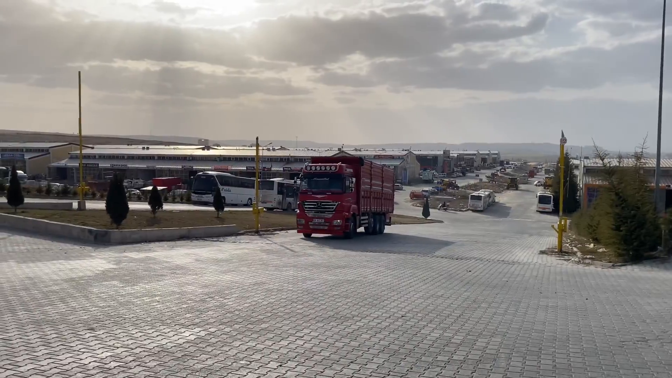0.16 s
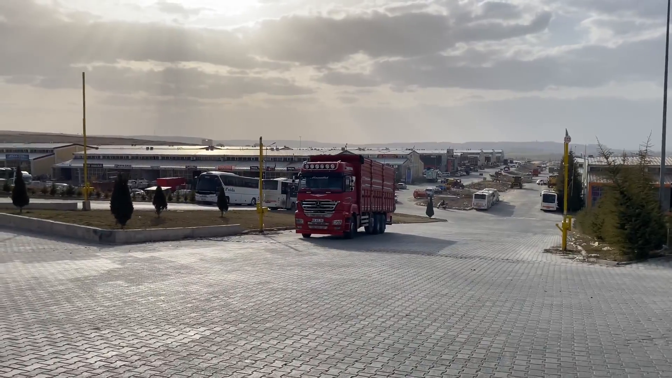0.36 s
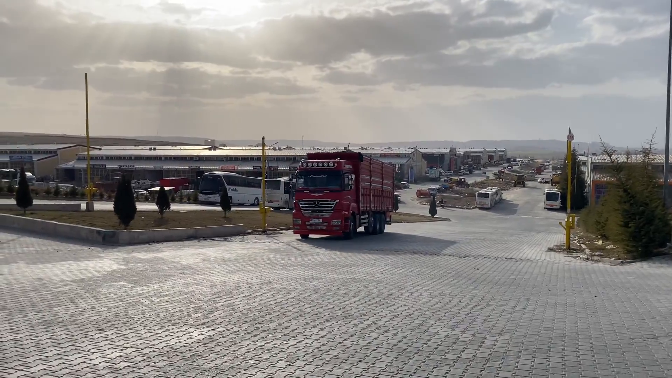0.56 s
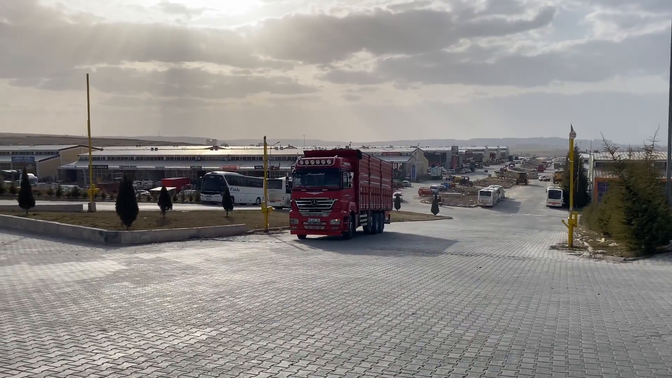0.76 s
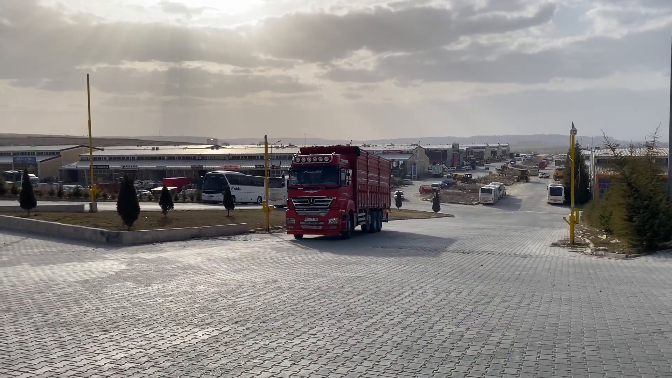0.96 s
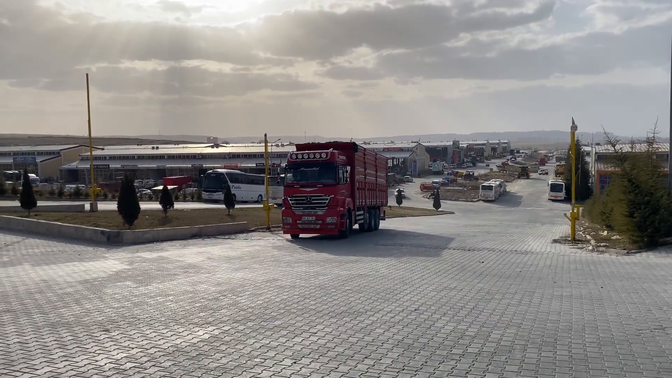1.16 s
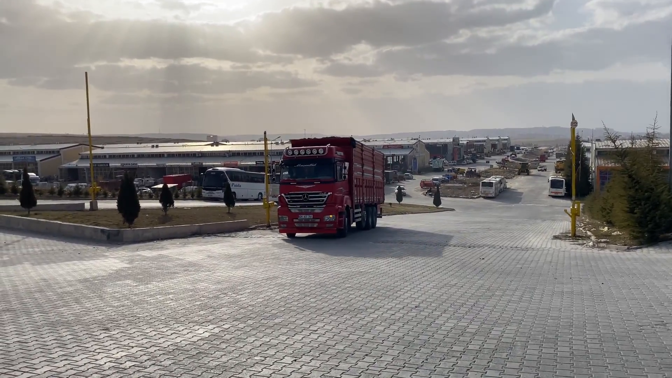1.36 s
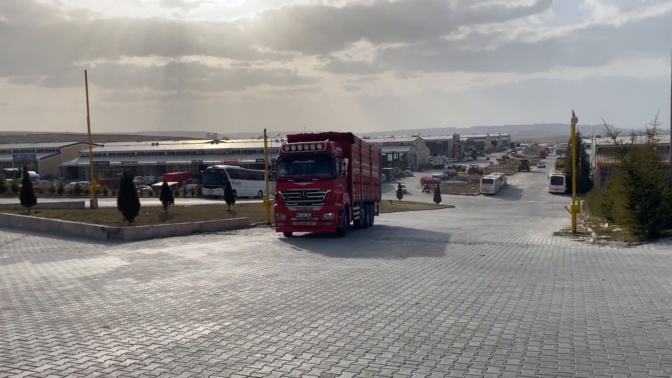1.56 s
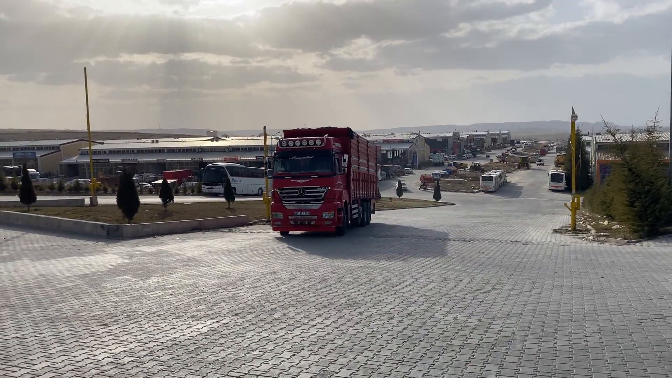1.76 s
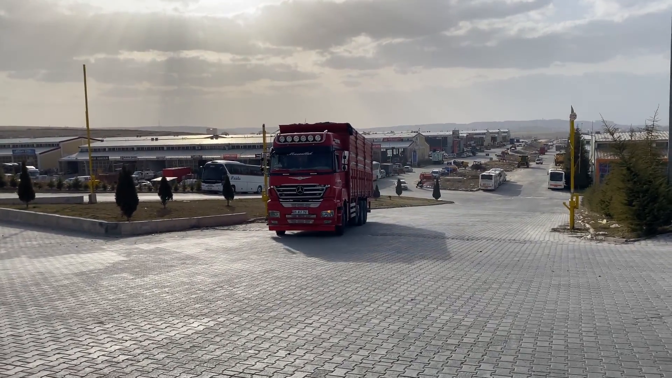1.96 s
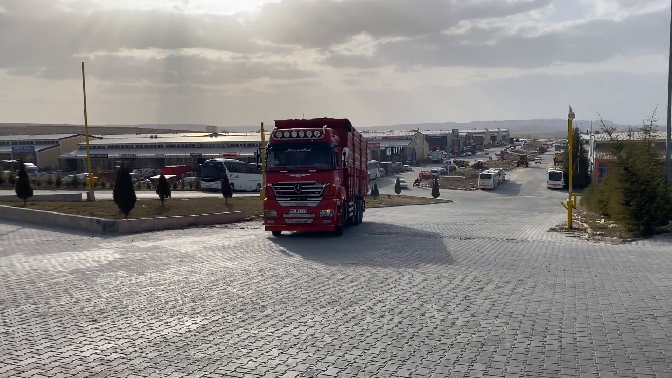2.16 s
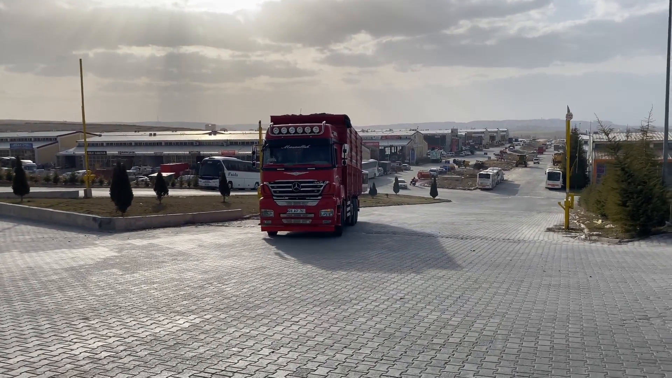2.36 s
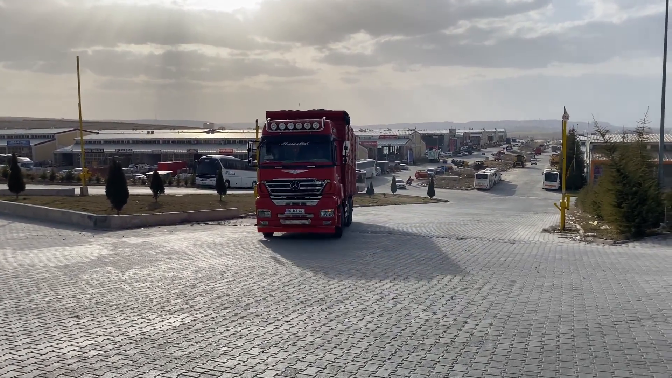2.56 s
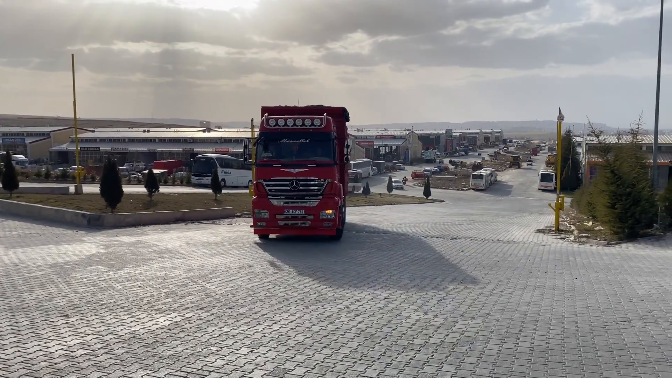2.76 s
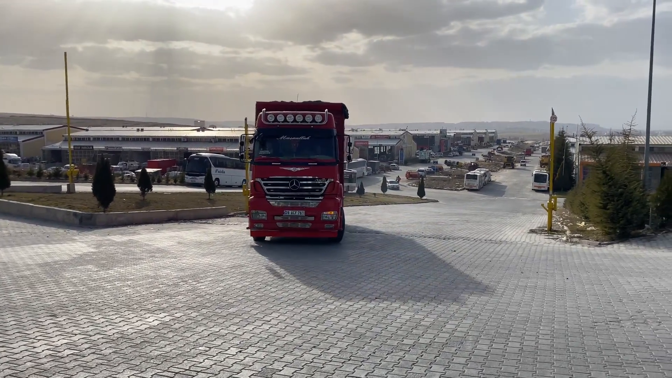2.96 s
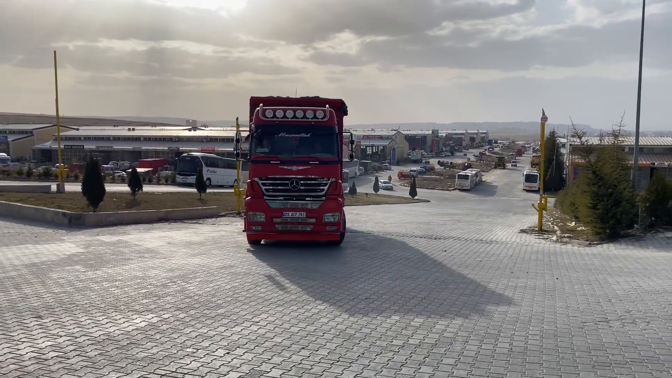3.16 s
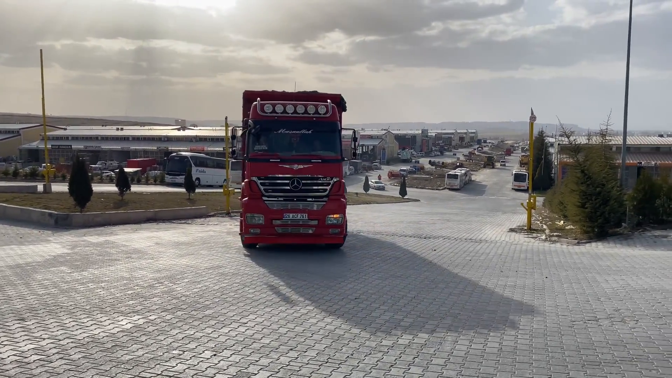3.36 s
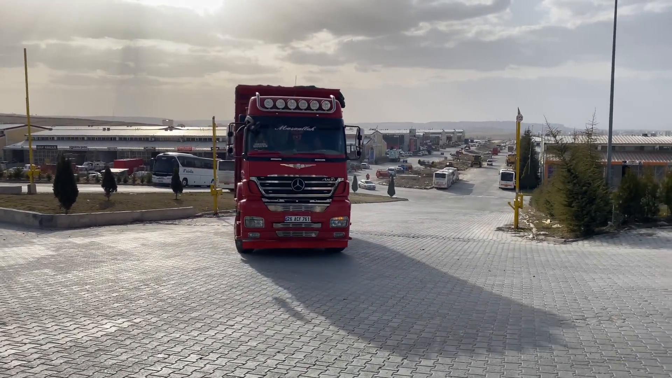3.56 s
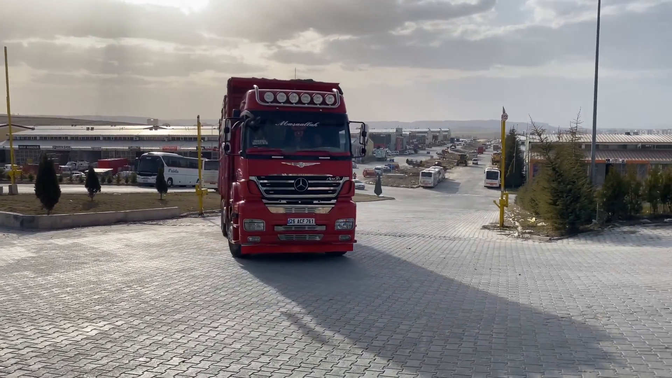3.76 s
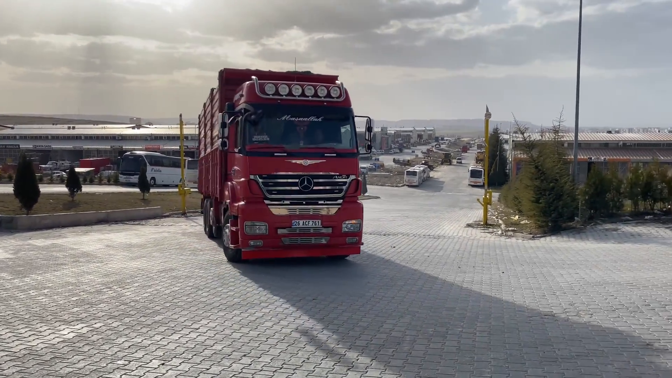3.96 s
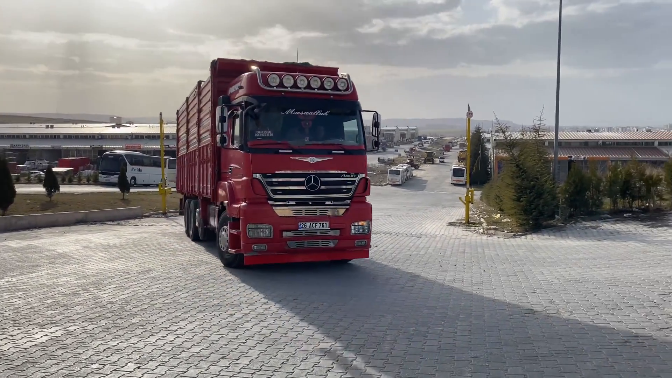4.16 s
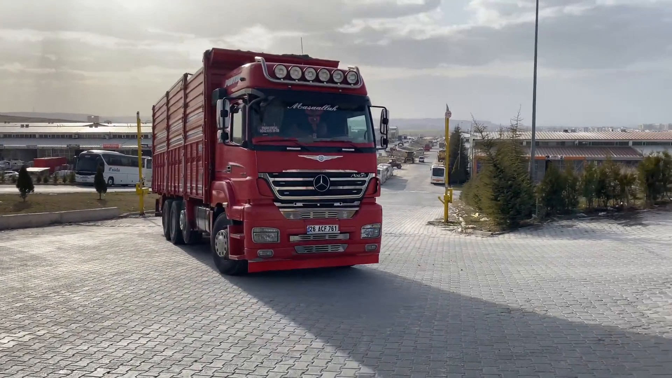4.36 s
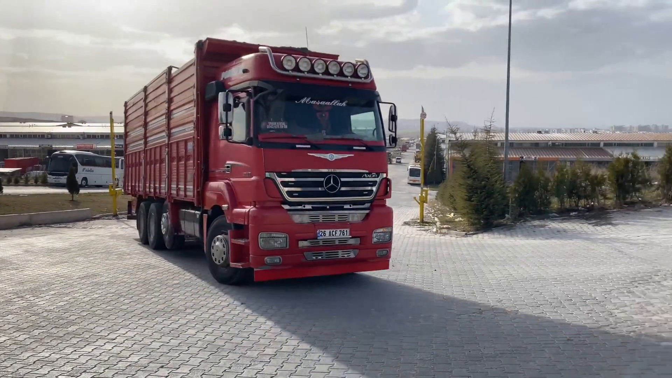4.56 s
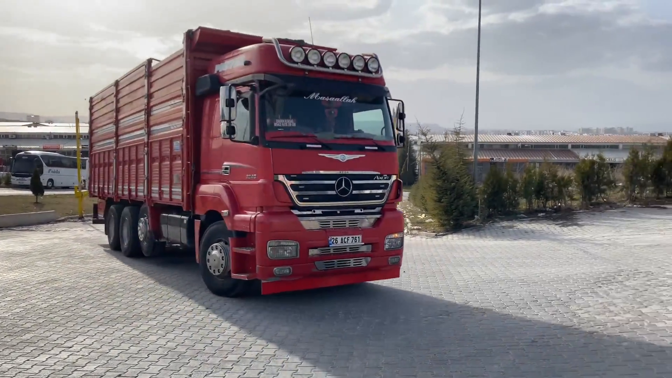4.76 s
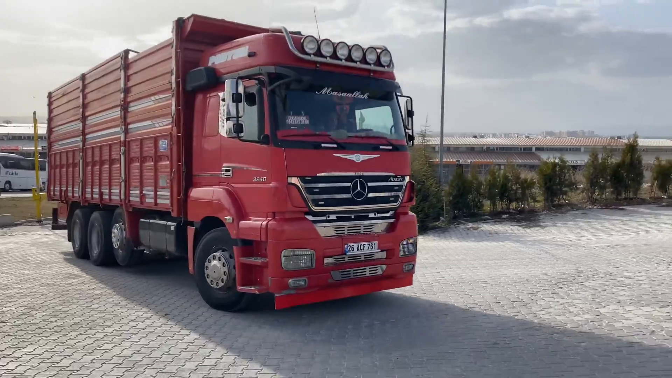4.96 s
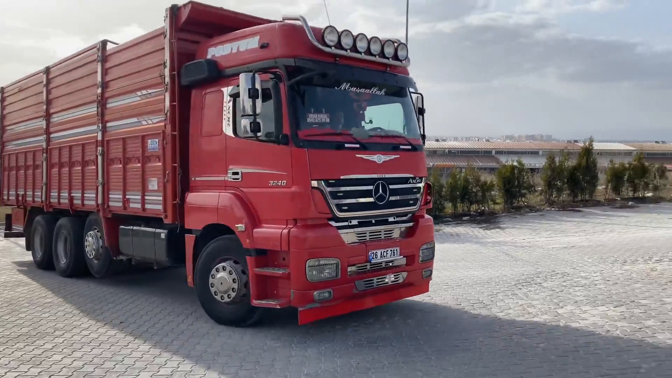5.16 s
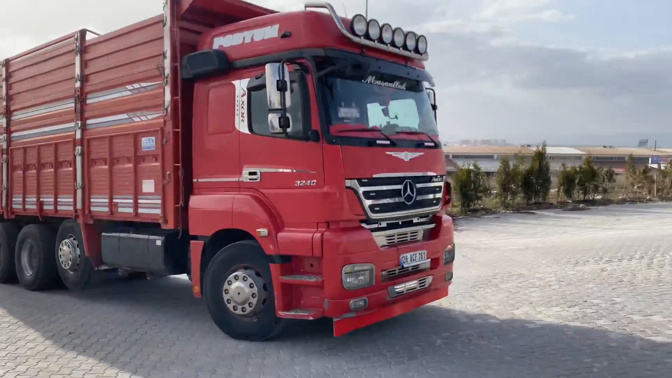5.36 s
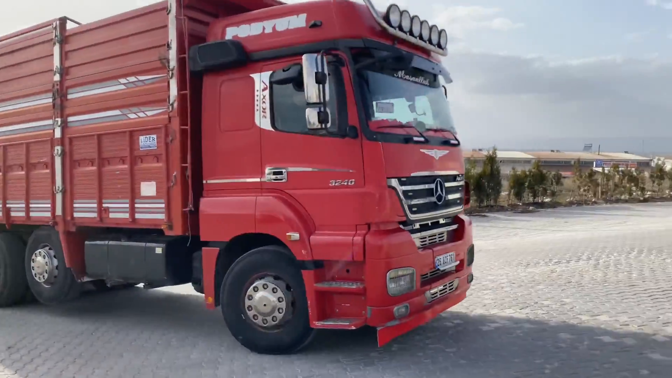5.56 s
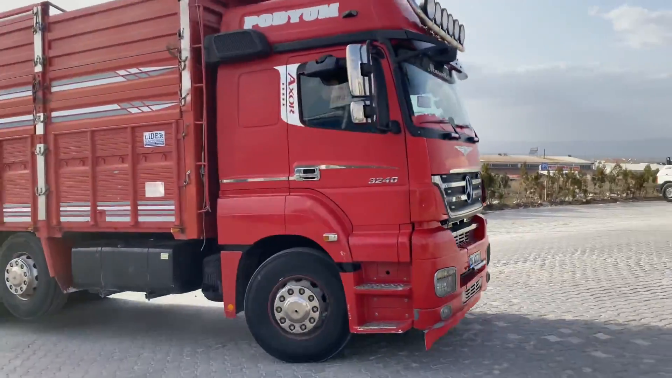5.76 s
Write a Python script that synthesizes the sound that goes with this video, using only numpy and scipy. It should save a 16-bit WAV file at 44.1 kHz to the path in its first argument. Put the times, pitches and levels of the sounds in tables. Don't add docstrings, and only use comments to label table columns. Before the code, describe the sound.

A heavy diesel truck rolls closer at low revs, knocking and humming over steady roar, with wind buffeting and popping at the microphone.

```python
import sys
import numpy as np
from scipy import signal
from scipy.fft import rfft, irfft, next_fast_len
from scipy.io import wavfile
from scipy.ndimage import uniform_filter1d, map_coordinates

SR = 44100
rng = np.random.default_rng(int(sys.argv[2]) if len(sys.argv) > 2 else 0)


def decibels_to_gain(level_db):
    exponent = np.asarray(level_db, float) / 20
    return 10 ** exponent


def materialize(psi):
    bounded = np.clip(np.atleast_2d(psi).T, -1, 1)
    quanta = np.round(bounded * 32767).astype(np.int16)
    wavfile.write(sys.argv[1], SR, quanta)


N = 256220
T = np.arange(N) / SR

# time in seconds, engine cycles per second.
CRANK_SPEED = [
    (0.0, 8.42),
    (1.0, 8.353),
    (2.0, 8.076),
    (3.0, 8.015),
    (4.0, 7.881),
    (5.0, 7.857),
    (5.81, 7.671),
]
# time in seconds, roar level in dB, nearness from 0 to 1, knock level in dB (load).
APPROACH = [(0, -31, 0, -1), (1, -30.5, 0.1, -5.5), (1.5, -30.5, 0.15, -2), (2, -29.5, 0.28, 1),
            (2.6, -28, 0.28, 0), (2.9, -28, 0.45, -1), (3.3, -26.5, 0.56, 3), (4, -26, 0.82, 1),
            (4.6, -24, 0.83, 1), (5.2, -22, 0.73, -1.5), (5.5, -22, 0.79, 2.5), (5.81, -21.5, 0.79, 4.5)]
# time in seconds, level in dB.
FIRING_TONE = [(0, -30.5), (.6, -40), (1.2, -51), (2.2, -43), (2.6, -33.5), (3, -30.5), (3.5, -26),
               (4.2, -24.5), (5.81, -23.5)]
# multiple of the cycle rate, levels in dB at six headings of the pipe, phase in radians.
ENGINE_ORDERS = [(8, -14, -15, 0, -18, -9, -20.0, -1), (9, -18.0, -37.0, 2, -2, -17.0, -7, -1),
                 (10, -17, -10.0, -20.0, -13, -23, -13, -0.5), (11, -1, -10, -8, -2, -11, -18, -1.8),
                 (12, 1.5, -8, 2, 3, -2.0, 5, 3.0), (13, -12, -6, 1, -36, -16, -6, 1.4),
                 (14, -24, -15.0, -14, -30.0, -13, 5, -0.1), (17, -12, -12, -36, -28.0, -25.0, -23, -1.1),
                 (18, -13.5, -1, -3, -6, -22, -11, -0.3), (24, -10.5, -10, -38.0, -13, -4, -3, 3),
                 (27, -33, -11, -29, -12.0, -7.5, -6, -2.5), (30, -18, -21.0, -0.5, -10, -8, -2.5, -2.0),
                 (36, -10, -19, -6.5, -9, -5, -6, 0.1), (42, -16.5, -17, -23, -20, -28, -32.0, -0.5)]
HEADING_S = (2.8, 3.4, 4.0, 4.6, 5.1, 5.55)
# frequency in Hz, 60 dB decay in seconds, lag after firing in ms,
# levels in dB for cylinders 1 to 6.
FRONT_MODES = [(701, 0.021, -1.92, -20, -27, -12, 0.5, -2, -6),
               (880, 0.0088, -1.84, -5, -2, -6, -2, -14, -2), (1023.5, 0.024, -1, 2, 3, -10, 10, -6, 0),
               (1587, 0.02, 0.35, -7, -6, -33, -28, 5, -24),
               (1696, 0.05, 1, -18, -4.5, -9, -2.5, -6.5, -13),
               (2130, 0.026, -1.97, -29, -20, -19, -3, -3, -29),
               (4120, 0.023, 0, -32, -15.5, -19, -14, -39, -41)]
TURN_MODES = [(650, 0.024, -4, -14, -24, -19, 4.5, -7, 1), (880, 0.045, -3, -16, -10, -9, 0, 1, 7),
              (1017, 0.045, -1.5, -0.5, -11, -6, -1, -3, -4.5), (1350, 0.018, 2, -17, -3, -5, -6, -8, -2),
              (1700, 0.034, -3, -25, -5, -18, -1, -16, -10), (2045, 0.023, -1.5, -25, 2, -22, 1, -3, 0),
              (3000, .009, -5, -24, -17, -30, -20, -22, -18)]
FLANK_MODES = [(677.5, 0.08, -2, -8, -11, -8, -9, -16, -17), (900, 0.026, -2, -10, 3.5, -11, -13, -13, -2),
               (1349, 0.026, 5, -11, -14, -22, -3, -3, -14),
               (1712, 0.032, -4, -30, -11, -15, -4.5, -14, -24),
               (1980, 0.022, -0.5, -30, 0, -10, 0.5, 3, -14), (2550, 0.015, -4, -22, 0, -16, -5, -34, -16),
               (2960, 0.0086, -0.5, -24, -20, -30, -20, -1, -29),
               (4040, 0.022, -0.5, -28, -16, -20, -9, -26, -26)]
FACING_S = (3.01, 3.83, 5.0)
# frequency in Hz, density in dB per Hz.
ROAR_FAR = [(40, -22), (100, 2.5), (250, 5), (420, -2.5), (620, -2), (1020, -4), (1300, -8.5), (1700, -11),
            (2150, -13), (2800, -22.5), (3700, -29.5), (5000, -36.5), (8000, -42.5), (15000, -48.5)]
# frequency in Hz, density in dB per Hz.
ROAR_NEAR = [(40, 11), (100, 8.5), (220, -2), (350, -2), (650, -7.5), (950, -4.5), (1400, -7), (2050, -5.5),
             (2800, -18.5), (3700, -19), (5000, -25), (7200, -28), (10000, -32.5), (15000, -34.5)]
# centre in Hz, width in Hz, gain in dB.
DUCTS = [
    (450, 100, -4),
    (1023, 102, -1),
    (1700, 90, -1.5),
    (3230, 41, -1),
    (6240, 580, 4.5),
]
# time in seconds, gain in dB, half width in seconds.
SMOOTH_PAVING = [
    (.5, -13, 0.066),
    (1.15, 0.5, .15),
    (1.75, -4, 0.22),
    (2.42, -6, 0.22),
    (3.7, 1, 0.13),
    (5, -6, 0.35),
]
# time in seconds, gain in dB, length in seconds.
CHIRPS = [
    (1.225, 8, .015),
    (4.885, 8, .012),
    (4.965, 2, .01),
    (5.13, 9, .015),
    (5.264, 13, 0.0088),
    (5.4, -3, 0.02),
    (5.607, 10, 0.017),
]
# frequency in Hz, left-right likeness far, likeness near, left minus right in dB.
PORTS = [(60, 0.24, 0.43, -2.5), (250, 0.21, 1, -1.5), (610, 0.36, 0.82, -3.5), (1280, 0.61, 1, -3.5),
         (1940, 1, 0.56, -6), (3150, 0.4, 0.77, 0), (5200, 0.025, 0.034, 4.5), (8400, 0.029, 0.035, -3.5),
         (14100, 0.17, 0.45, 0)]
# time in seconds, first band in Hz, its gain in dB, second band
# in Hz, its gain in dB.
SHIFTING_COLOUR = [(0, 440, -17, 277, -2), (.5, 447, -6, 1700, 3.5), (.8, 450, -4, 298, 5.5),
                   (1.1, 1420, -2, 880, 2.5), (1.7, 390, -9, 1060, -3), (2.2, 450, -1.5, 310, 5),
                   (2.7, 700, -3.5, 900, 2), (3.2, 640, -3.5, 800, -0.5), (3.7, 630, -3, 786, 3),
                   (4.25, 657, 1, 794, 3), (4.75, 200, -3, 420, 3.5), (5.2, 750, -2, 208, 9),
                   (5.6, 380, -2, 214, 5.5), (5.81, 390, -12, 1580, 3.5)]
# frequency in Hz, density in dB per Hz.
WIND_SPECTRUM = [(20, -12), (32, -22), (45, 4.5), (70, 5.5), (110, -5), (200, -10.5), (350, -16),
                 (700, -27.5), (2500, -79)]
# time in seconds, peak in dB, hold in seconds, left minus right in dB.
GUSTS = [(0.06, -22.5, 0.02, 2), (0.194, -23.5, .1, 3), (0.333, -24, 0.021, 6), (0.42, -25, 0.049, -1),
         (0.527, -24, 0.094, -2), (0.647, -28.5, 0.012, -1), (0.704, -31, 0.017, 0), (.9, -30.5, 0.022, 4),
         (1.335, -36, 0.061, -7), (1.717, -41, 0.018, -14), (1.95, -28.5, 0.13, -7), (2.208, -37, 0.014, 0),
         (2.69, -27, 0.063, -2), (2.852, -23, 0.014, -6), (3.13, -31, 0.031, -2), (4.073, -34, 0.034, -7),
         (4.34, -30, 0.031, -14), (4.655, -22, 0.11, 0), (4.94, -22, 0.097, -7), (5.176, -23, 0.017, 2),
         (5.293, -22, 0.089, -6), (5.544, -24.5, 0.15, -5.5)]
# time in seconds, peak in dB, frequency in Hz, length in seconds.
POPS = [(0.147, -34, 171, 0.0046), (0.165, -19, 80, .01), (0.208, -14.5, 90, 0.0087),
        (.237, -26, 160, 0.005), (.26, -19, 80, 0.0093), (0.353, -20.5, 68, .012), (.42, -25, 110, 0.0042),
        (.458, -21, 80, 0.011), (0.553, -25, 90, .01), (0.658, -16, 79, 0.0074), (0.576, -38, 180, 0.0036),
        (0.714, -20, 169, 0.0024), (.7205, -19, 330, 0.001), (0.728, -17.5, 150, 0.0026),
        (0.883, -28, 274, 0.0076), (1.09, -30, 290, .004), (1.203, -27, 172, 0.0085),
        (1.2255, -25, 267, 0.0073), (1.335, -27, 270, 0.0069), (1.4262, -20, 500, .001),
        (1.4286, -18.5, 330, 0.0026), (2.352, -39, 189, .004)]
# time in seconds, peak in dB, decay in seconds.
VALVE_TICKS = [
    (4.0232, -22.5, .0011),
    (4.0255, -33, .0015),
]
# low edge in Hz, high edge in Hz, gain in dB, share of empty frames
THIN_SUM = [(7240, 7580, 0, .2, 0), (7580, 8000, 0, .15, 0), (9600, 9900, 0, .2, .03),
            (10600, 10950, 0, .12, 0), (11400, 11750, 0, .12, 0), (8000, 8270, 0, .2, 0),
            (8270, 8610, -2, .6, .15), (8610, 8950, -3, .85, .35), (8950, 9300, -5, 1, .8),
            (9300, 9600, -5, 1, .85), (12100, 12400, 0, .25, .05), (12400, 13780, -45, 1, 1),
            (13780, 14100, -2, .5, .3), (14100, 14470, -2, .35, .2), (14470, 14820, -2, .5, .1),
            (14820, 15160, -2, .6, .3), (15160, 15500, -3, .95, .6), (15500, 16000, -3, 1, .8)]
THIN_DIFFERENCE = [
    (10400, 11700, -35, 0, 0),
    (14500, 16000, -40, 0, 0),
]


def rms_one(x):
    return x / np.sqrt(np.mean(x ** 2) + 1e-20)


def in_time(rows):
    s, *columns = np.transpose(rows)
    return [np.interp(T, s, column) for column in columns]


def at_hz(points, hz, axis=1):
    points = np.array(points)
    return np.interp(np.log(hz), np.log(points[:, 0]), points[:, axis])


def bump(centre_s, width_s):
    return np.exp(-((T - centre_s) / width_s) ** 2)


def drift(rate):
    r = np.exp(-80 * np.pi * rate / SR)
    slow = signal.lfilter([1], [1, -2 * r, r * r], rng.standard_normal(N // 40 + 2002))
    slow = slow[2000:]
    return np.interp(np.arange(N) / 40, np.arange(len(slow)), rms_one(slow))


def coloured(x, gain_db):
    size = next_fast_len(N)
    hz = np.maximum(np.fft.rfftfreq(size, 1 / SR), 1)
    return irfft(rfft(x, size) * decibels_to_gain(gain_db(hz)), size)[..., :N]


def ring(clicks, hz, t60):
    r, w = decibels_to_gain(-60 / (t60 * SR)), 2 * np.pi * hz / SR
    return signal.lfilter([0, np.sin(w)], [1, -2 * r * np.cos(w), r * r], clicks + 1e-18)


def wind(near):
    breeze_db, backwash_db, sway_db = -43.5, 16, 2.5
    rise_db_per_s, fall_db_per_s = 350, 177
    shared = 0.07
    sides = np.array([[.5], [-.5]])
    power = decibels_to_gain(breeze_db + backwash_db * near + sway_db * drift(1.2) * sides) ** 2
    for s, peak_db, hold, pan_db in GUSTS:
        loss_db = rise_db_per_s * np.maximum(s - T, 0) + fall_db_per_s * np.maximum(T - s - hold, 0)
        heard = loss_db < 50
        power[:, heard] += decibels_to_gain(peak_db - loss_db[heard]) ** 2 * decibels_to_gain(pan_db * sides) ** 2
    white = rng.standard_normal((2, N))
    out = coloured(white + shared * white[::-1], lambda hz: at_hz(WIND_SPECTRUM, hz))
    out = rms_one(out / uniform_filter1d(out ** 2, size=2600) ** .35)
    lumps_db = 3.5 * np.array([drift(25), drift(25)])
    out *= decibels_to_gain(lumps_db - 1.0) * np.sqrt(power)
    for s, peak_db, hz, length in POPS:
        out -= decibels_to_gain(peak_db) * bump(s, length) * np.cos(2 * np.pi * hz * (T - s))
    return out


def valve():
    envelope = np.zeros(N)
    for s, peak_db, decay in VALVE_TICKS:
        envelope += decibels_to_gain(peak_db) * (T > s) * np.exp(-np.maximum(T - s, 0) / decay)
    band = signal.butter(3, [7400, 17000], "band", fs=SR, output="sos")
    hiss = signal.sosfilt(band, rng.standard_normal((2, N)))
    spit = envelope * (hiss[0] + 0.8 * hiss * [[0], [1]])
    return spit + decibels_to_gain(-16) * ring(spit, hz=11500, t60=.004)


def whistle(roar_db):
    hidden_from_s, hidden_to_s = 2.0, 4.3
    under_roar_db, hidden_db, shown_again_db, flutter_db = -25.5, -10, 1, 2.5
    noise = rng.standard_normal((2, N))
    noise = noise[0] + 0.3 * noise * [[0], [1]]
    tone = rms_one(ring(ring(noise, 4000, 0.0059), 4000, 0.0059))
    hidden = np.clip(np.minimum(T - hidden_from_s, hidden_to_s - T) / 0.037, 0, 1)
    level_db = roar_db + under_roar_db + hidden_db * hidden
    level_db += shown_again_db * (T > hidden_to_s) + flutter_db * drift(15)
    level_db += sum(db * bump(s, length) for s, db, length in CHIRPS)
    return tone * decibels_to_gain(level_db - 4 + np.array([[1.5], [-1.5]]))


def tyre_rumble():
    rumble_db = -5 - 0.54 * drift(0.47)
    return rumble_db + sum(db * bump(s, width) for s, db, width in SMOOTH_PAVING)


def roar(firing, near, bright_db, patchy_db, throb_db):
    size = next_fast_len(N)
    white = rfft(rng.standard_normal((2, N)), size)
    hz = np.maximum(np.fft.rfftfreq(size, 1 / SR), 1)
    ducts_db = sum(db * np.exp(-((hz - top) / width) ** 2) for top, width, db in DUCTS)
    white = white * decibels_to_gain(at_hz(ROAR_FAR, hz) + ducts_db)
    push = np.array([0.43, 0.97, 0.65, 1.0, 0.66, 0.63])
    beat = np.exp(-(firing % 1) / 0.83) * push[np.floor(firing).astype(int) % 6]
    beat -= beat.mean()
    together, rumble_db = drift(6.4), tyre_rumble()
    out = np.zeros((3, N))
    for centre in 40 * 2 ** np.arange(0, 9, .5):
        window = np.cos(np.pi / 2 * np.clip(2 * np.log2(hz / centre), -1, 1)) ** 2
        shared, own = irfft(white * window, size)[:, :N]
        treble = np.clip(np.log2(centre / 1000) / 2, 0, 1)
        level_db = near * (at_hz(ROAR_NEAR, centre) - at_hz(ROAR_FAR, centre))
        level_db += treble * bright_db + (centre < 350) * rumble_db
        level_db += patchy_db * (0.33 * together + drift(26))
        level_db += throb_db * beat * np.clip(centre / 900, 0, 1)
        alike = at_hz(PORTS, centre) * (1 - near) + at_hz(PORTS, centre, axis=2) * near
        alike = np.clip(alike, 0, 1)
        out += decibels_to_gain(level_db) * np.array([shared, alike * shared, np.sqrt(1 - alike ** 2) * own])
    middle = signal.butter(4, [500, 2400], "band", fs=SR, output="sos")
    return out / np.sqrt(np.mean(signal.sosfilt(middle, out[0]) ** 2))


def knocks(firing, modes, spread_db, jitter_s):
    at = np.flatnonzero(np.diff(np.floor(firing)) > 0)
    cylinder = np.floor(firing[at + 1]).astype(int) % 6
    out = np.zeros(N)
    for hz, t60, lag_ms, *strength_db in modes:
        chance = rng.standard_normal((len(at), 4))
        clicks = np.zeros(N)
        for blow in range(2):
            delay_s = lag_ms / 1000 + jitter_s * chance[:, 0] + blow * (0.0029 + .00008 * chance[:, 1])
            when = at + SR * delay_s
            size_db = np.array(strength_db)[cylinder] + spread_db * chance[:, 2 + blow] - 5 * blow
            np.add.at(clicks, np.clip(when.astype(int), 0, N - 1), decibels_to_gain(size_db))
        rise = np.hanning(760) * np.cos(2 * np.pi * hz * np.arange(760) / SR) / 140
        out += ring(signal.oaconvolve(clicks, rise)[400:N + 400], hz, t60)
    return out


def block_knock(firing, knock_db):
    front, turn, flank = [np.interp(T, FACING_S, share) for share in np.eye(3)]
    block = front * knocks(firing, FRONT_MODES, spread_db=1.0, jitter_s=.0009)
    block += turn * knocks(firing, TURN_MODES, spread_db=0.5, jitter_s=0.001115)
    block += flank * knocks(firing, FLANK_MODES, spread_db=3.0, jitter_s=0.001793)
    return block * decibels_to_gain(knock_db + 2.5)


def exhaust(cycle):
    tone_db, = in_time(FIRING_TONE)
    over_db = np.minimum(-8, -36 - tone_db)
    out = decibels_to_gain(1.5 * drift(5)) * np.cos(12 * np.pi * cycle + 2.5)
    for order, *heading_db, phase in ENGINE_ORDERS:
        wobble = .3 * drift(1.5)
        level_db = over_db + np.interp(T, HEADING_S, heading_db) + 0.61 * drift(3.3)
        out += decibels_to_gain(level_db) * np.cos(2 * np.pi * order * cycle + phase + wobble)
    return np.sqrt(2) * decibels_to_gain(tone_db) * out


def shift_colour(x):
    width_octaves = 0.17
    hz, s, frames = signal.stft(x, SR, nperseg=2048)

    def peak(centre):
        return np.exp(-(np.log2(np.maximum(hz, 1) / centre) / width_octaves) ** 2)

    colours = np.array([cut_db * peak(low) + lift_db * peak(top) for _, low, cut_db, top, lift_db in SHIFTING_COLOUR])
    moments = np.arange(len(SHIFTING_COLOUR))
    place = np.interp(s, np.array(SHIFTING_COLOUR)[:, 0], moments)
    fade = np.maximum(1 - np.abs(place - moments[:, None]), 0)
    return signal.istft(frames * decibels_to_gain(colours.T @ fade), SR, nperseg=2048)[1][..., :N]


def scene():
    cycle = np.cumsum(in_time(CRANK_SPEED)[0]) / SR
    firing = 6 * cycle - .17
    roar_db, near, knock_db = in_time(APPROACH)
    near = np.clip(near, 0, 1)
    lead = 2.2 + (4.22 - 2.2) * np.sqrt(near)
    bright_db = 1 + 3 * near - 8.5 * bump(4.08, 1.7)
    left, right, own = roar(firing, near, bright_db, patchy_db=1.08, throb_db=3.5)
    block = block_knock(firing, knock_db)
    hum = exhaust(cycle)
    left = decibels_to_gain(roar_db - 2.0) * (left + block)
    right = decibels_to_gain(roar_db - 0.5) * (right + 0.73 * block)
    right = map_coordinates(right, [np.arange(N) - lead], order=3, mode="mirror")
    right += decibels_to_gain(roar_db - 3.0) * own
    left, right = shift_colour(np.array([left, right]))
    left = coloured(left + hum, lambda hz: at_hz(PORTS, hz, axis=3) / 2)
    right = coloured(right + np.roll(hum, -35), lambda hz: -at_hz(PORTS, hz, axis=3) / 2)
    return np.array([left, right]) + whistle(roar_db) + wind(near) + valve()


def thin(x, bands):
    hz, s, frames = signal.stft(x, SR, nperseg=2048)
    gain, late = np.ones(frames.shape), (s / s[-1]) ** 2
    for low, high, db, empty_start, empty_end in bands:
        kept = rng.random(len(s)) > empty_start + (empty_end - empty_start) * late
        gain[(hz > low) & (hz <= high)] = decibels_to_gain(db) * np.maximum(kept, .005)
    tick = np.abs(s - VALVE_TICKS[0][0]) < .012
    gain[:, tick] = np.maximum(gain[:, tick], .6 * (hz < 15900)[:, None])
    return signal.istft(frames * gain, SR, nperseg=2048)[1][:N]


def top_cut(x):
    return signal.sosfilt(signal.butter(12, 15750, fs=SR, output="sos"), x)


def record(dry):
    rounded = 1.3 * np.tanh(dry / 1.3)
    left, right = signal.sosfilt(signal.butter(2, 30, "high", fs=SR, output="sos"), rounded)
    mid = thin(left + right, THIN_SUM) / 2
    side = thin(left - right, THIN_DIFFERENCE) / 2
    return top_cut(np.array([mid + side, mid - side]))


dry = scene()
out = record(dry)
materialize(out)
```